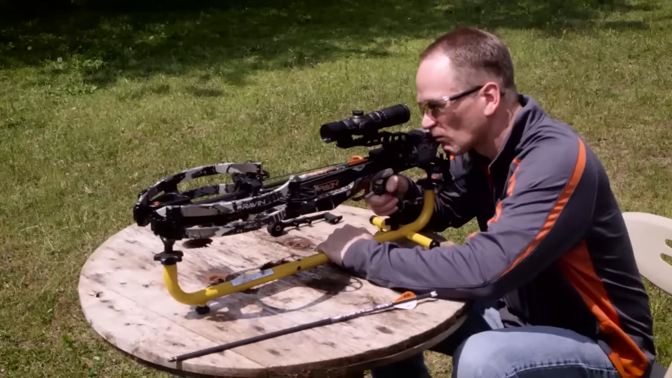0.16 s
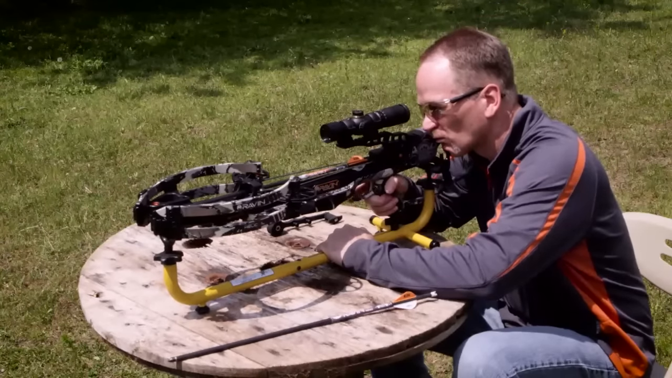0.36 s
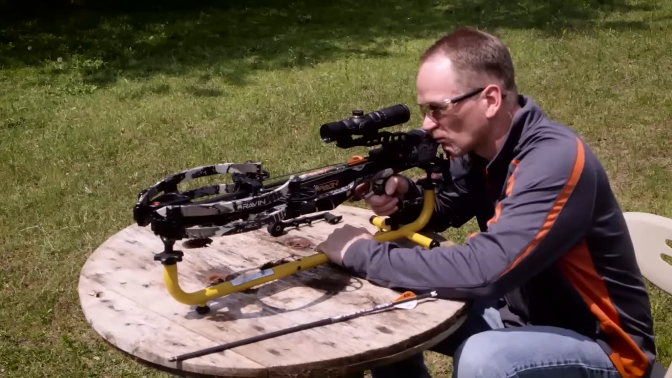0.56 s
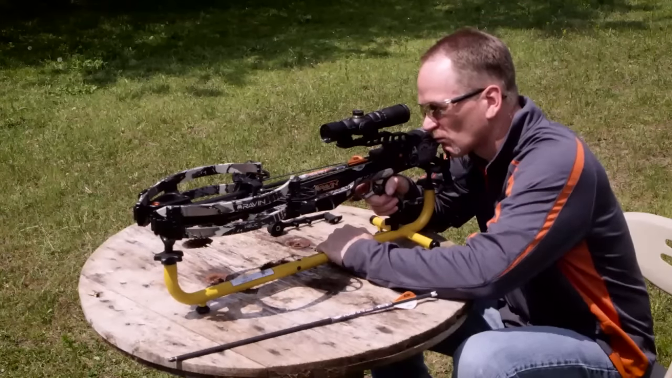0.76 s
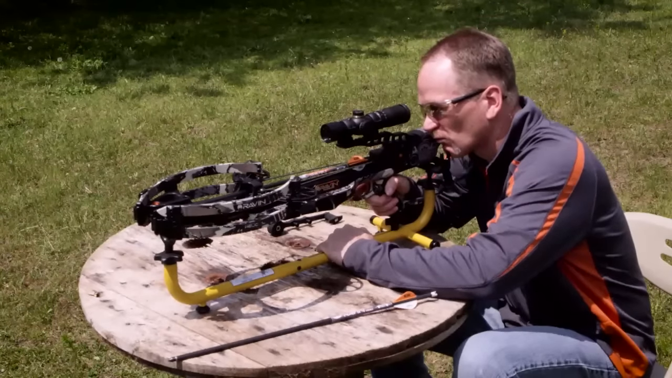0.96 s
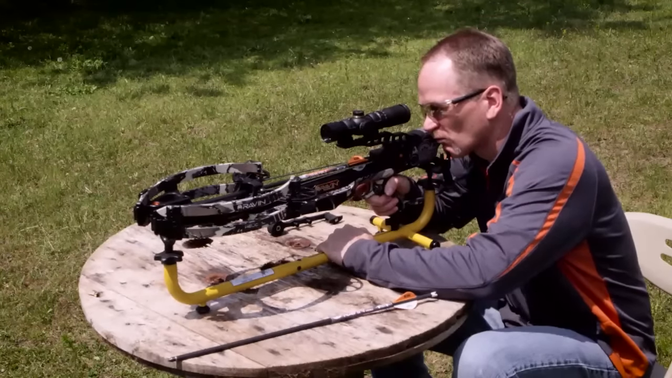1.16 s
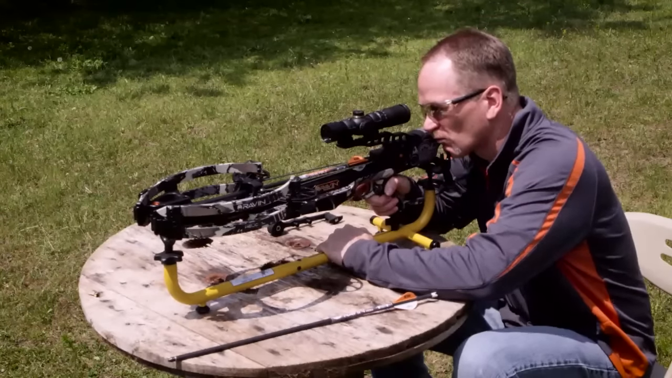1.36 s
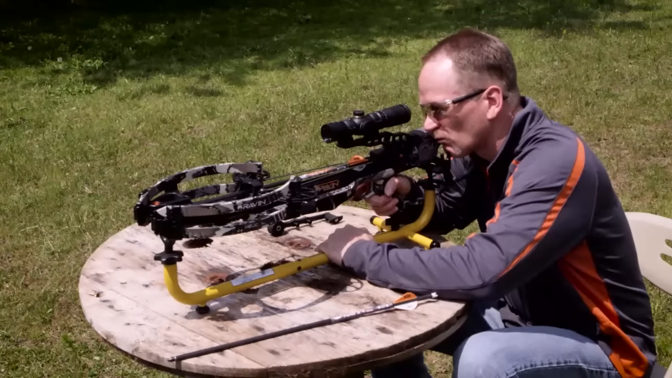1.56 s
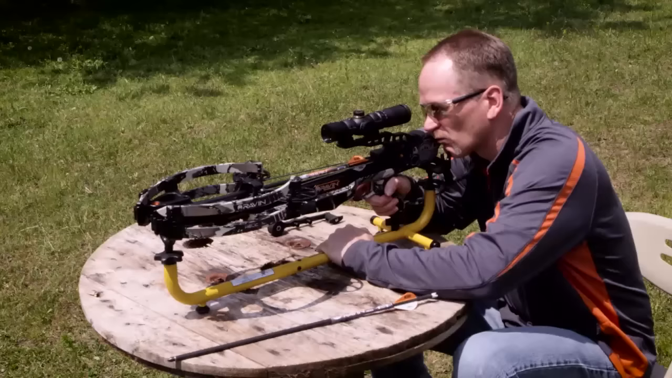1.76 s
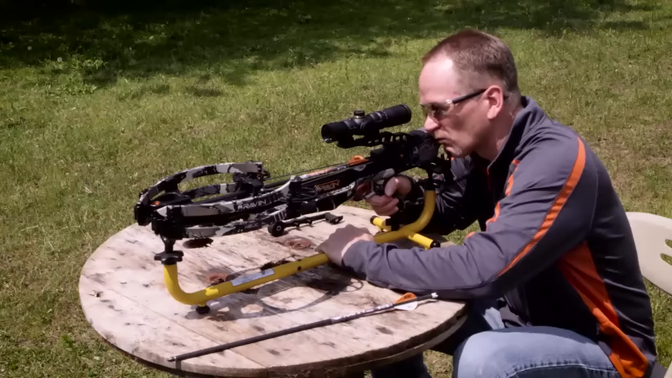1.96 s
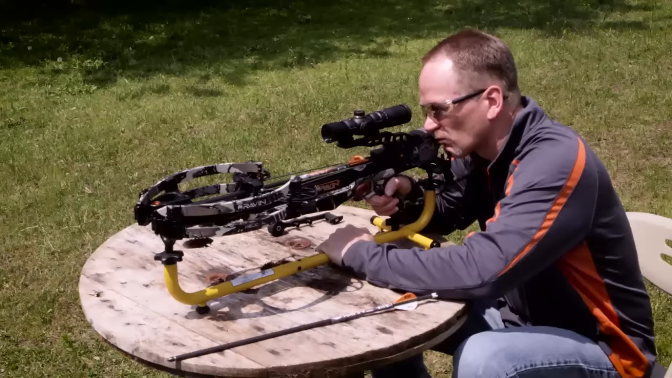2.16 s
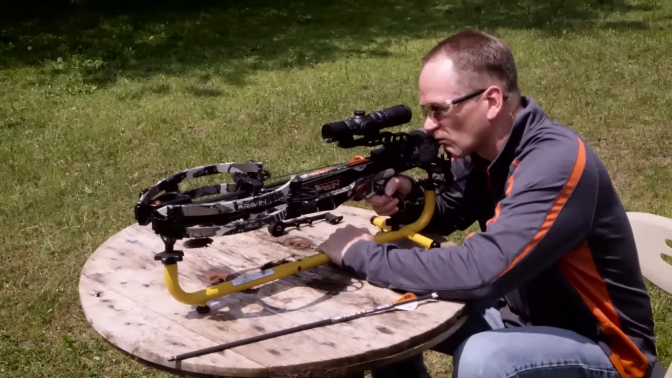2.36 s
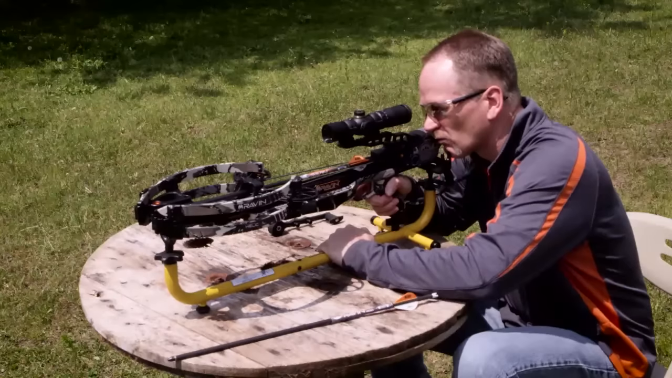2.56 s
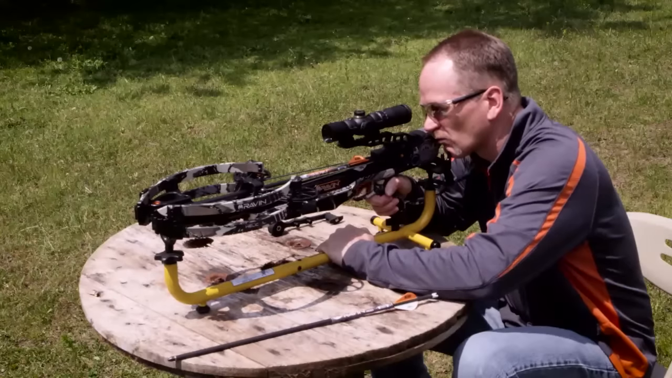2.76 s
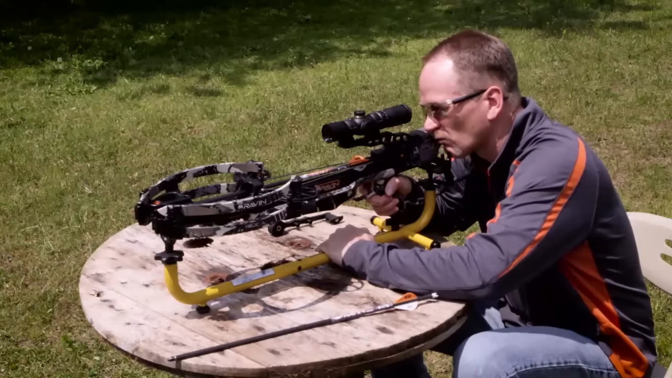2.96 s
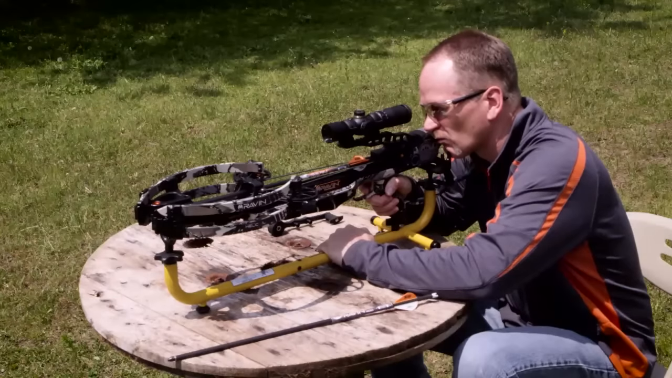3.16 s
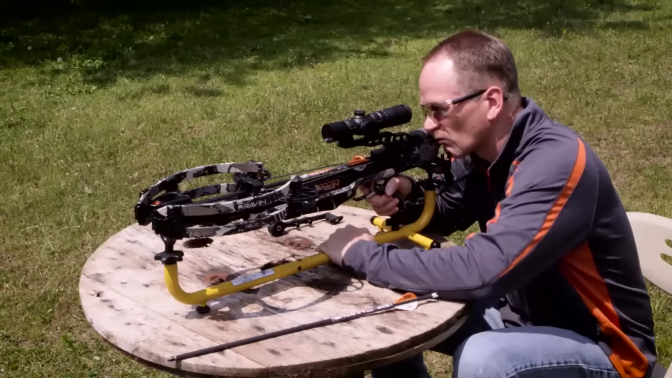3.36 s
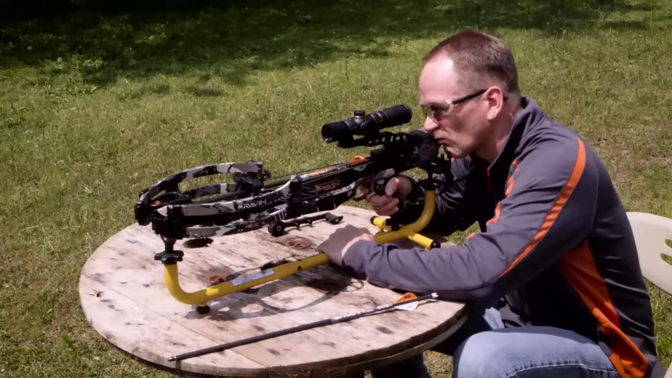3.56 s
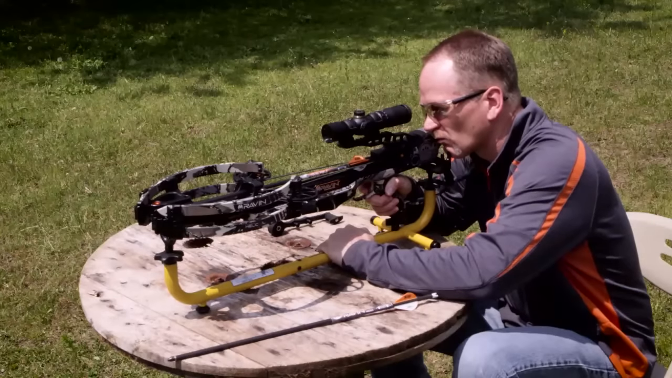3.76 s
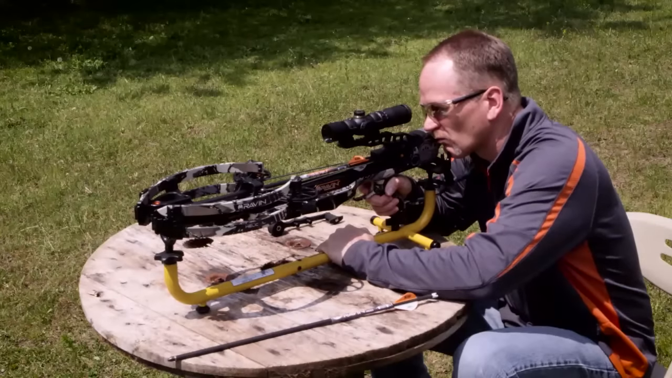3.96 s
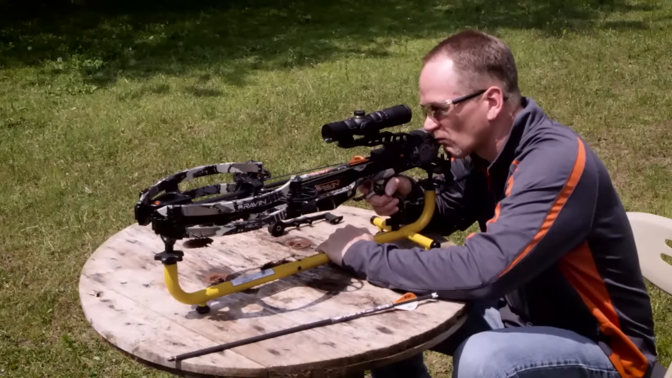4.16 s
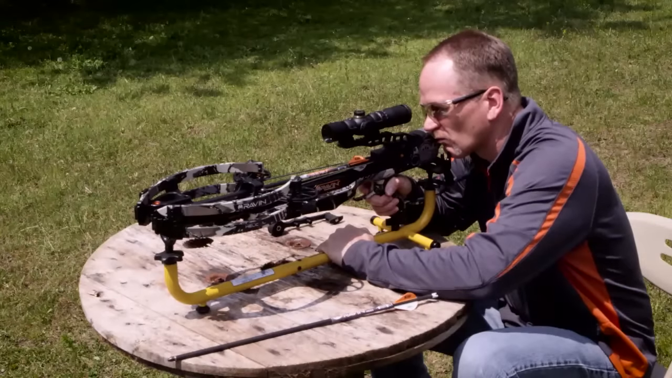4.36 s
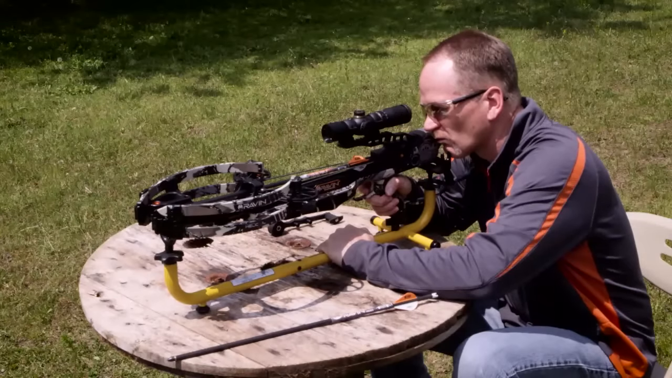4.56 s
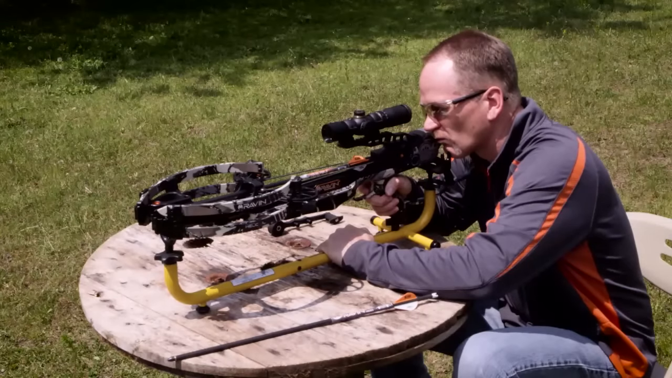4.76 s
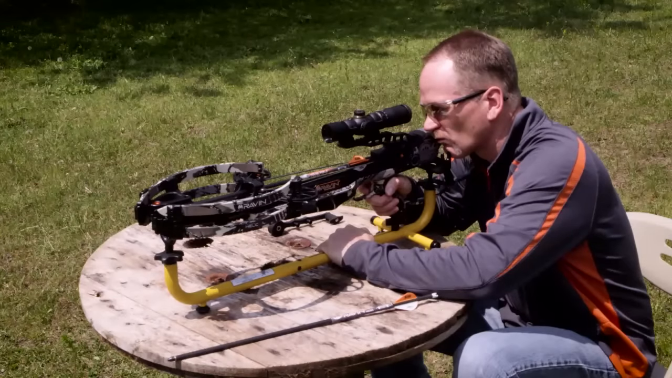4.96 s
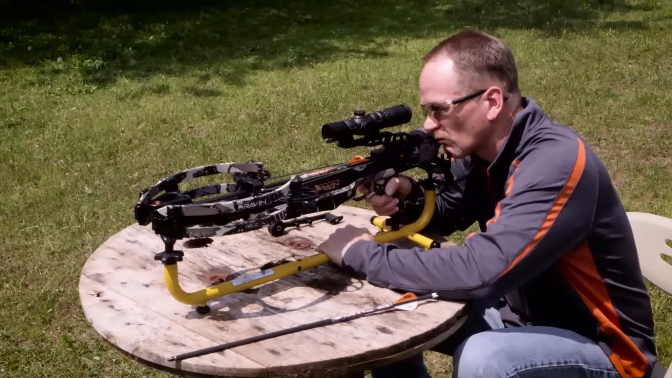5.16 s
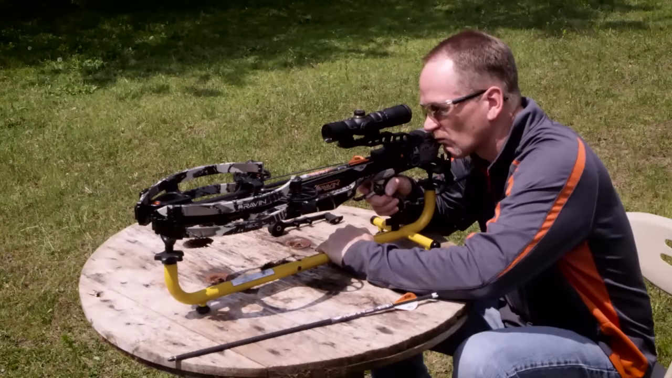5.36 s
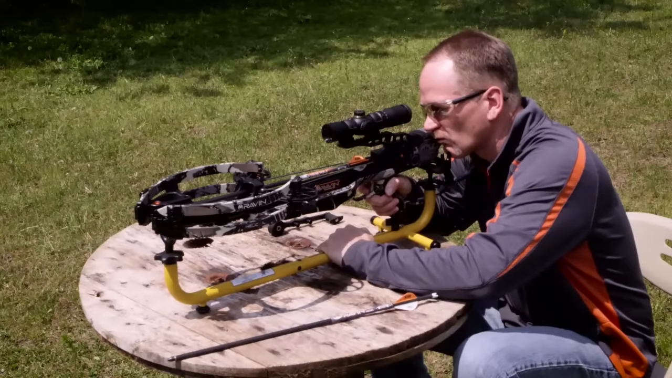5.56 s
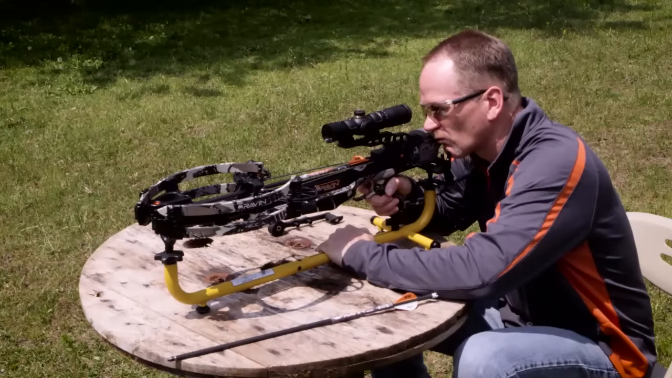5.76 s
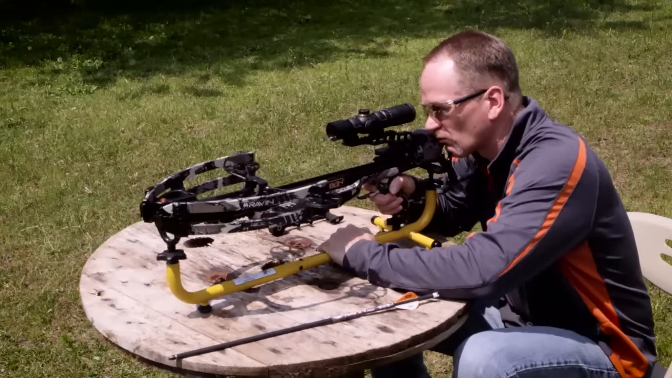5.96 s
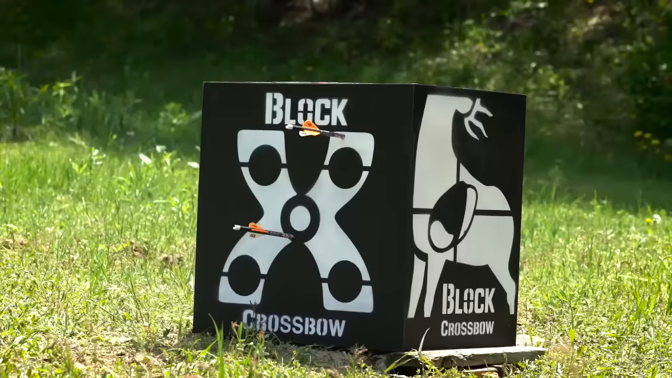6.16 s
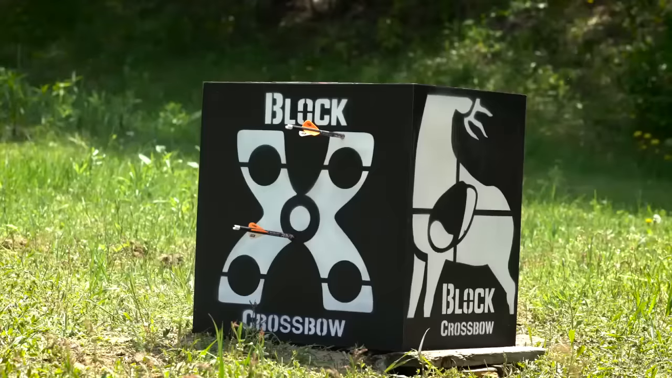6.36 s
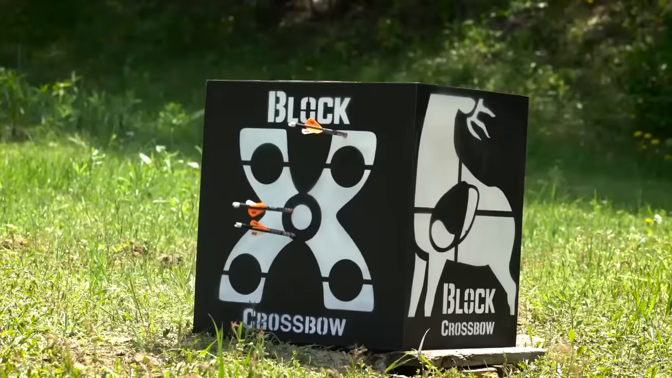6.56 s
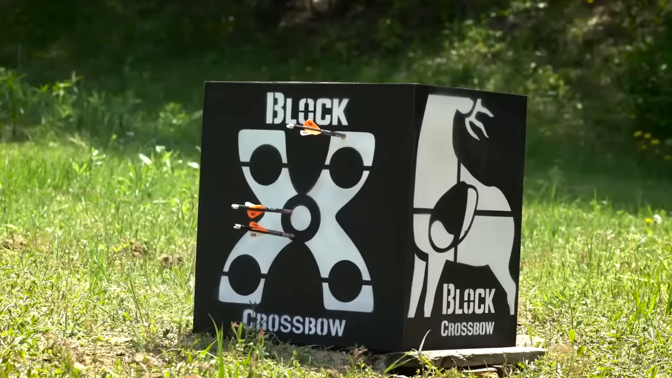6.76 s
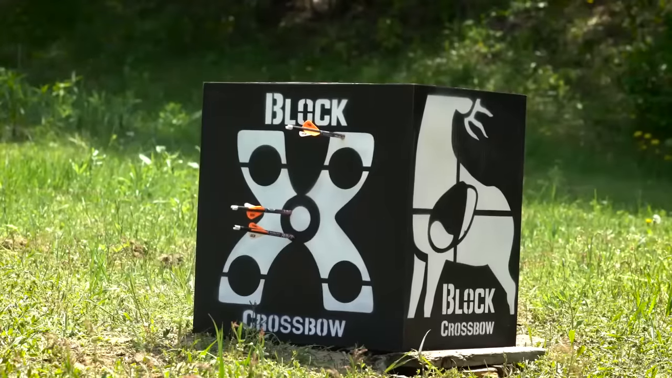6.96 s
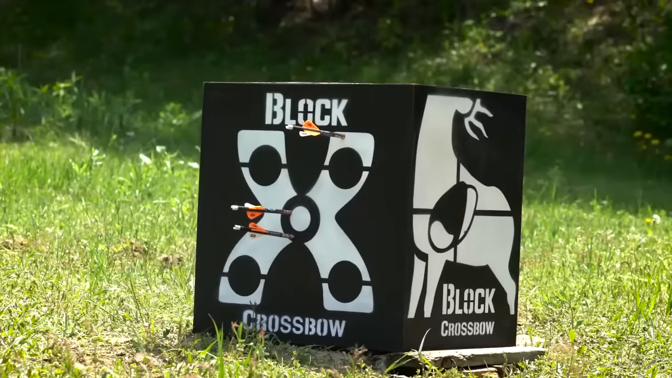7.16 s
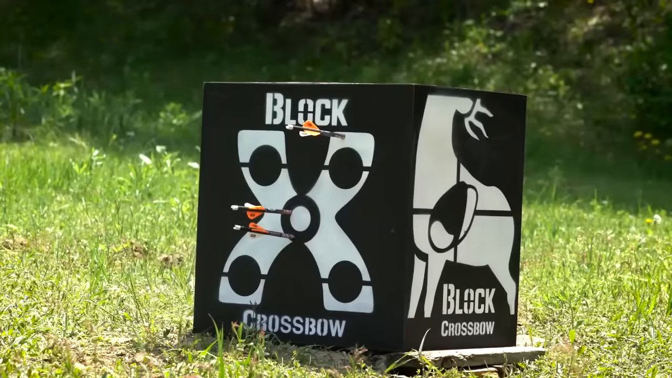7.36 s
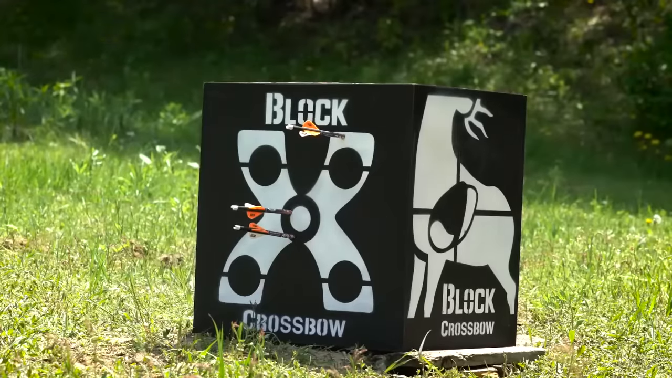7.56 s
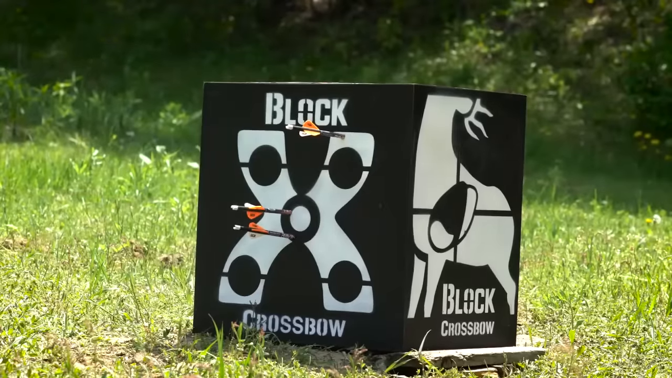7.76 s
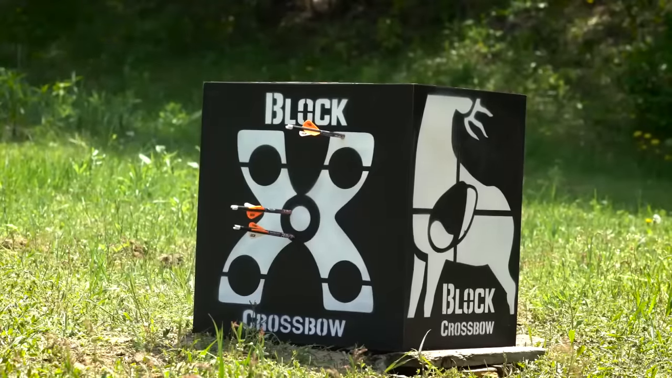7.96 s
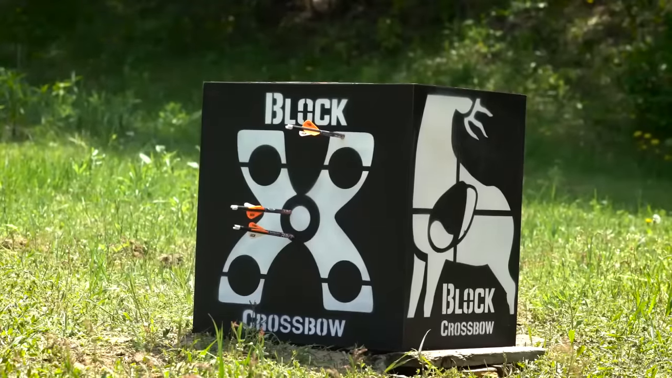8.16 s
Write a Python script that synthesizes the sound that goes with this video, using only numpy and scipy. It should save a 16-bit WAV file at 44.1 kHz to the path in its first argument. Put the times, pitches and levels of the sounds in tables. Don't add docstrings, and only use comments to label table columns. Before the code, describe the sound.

Outdoors, soft chirps, cloth rustle and faint taps lead to a sharp crossbow release, clattering and echoing off trees, followed by an arrow's dull hit.

```python
import sys
import numpy as np
from scipy import signal
from scipy.io import wavfile
from scipy.ndimage import uniform_filter1d

SR = 44100
rng = np.random.default_rng(int(sys.argv[2]) if len(sys.argv) > 2 else 0)


def to_wav(s):
    ch = np.atleast_2d(s).T
    pcm = np.round(np.clip(ch, -1, 1) * 32767)
    wavfile.write(sys.argv[1], SR, pcm.astype(np.int16))


def undo_db(level):
    steps = np.asarray(level, float) / 20
    return 10 ** steps


N = 361607

SHOT_S, LOOSE_S, STRIKE_S = 5.9, 5.9825, 6.501
CUT_S = 6.2
PITCH_WOBBLE = .005


def evened(x):
    return x / np.sqrt(np.mean(x ** 2) + 1e-20)


def add(mix, s, sound):
    part = mix[round(s * SR):][:len(sound)]
    part += sound[:len(part)]


def read(points, hz):
    f, value = np.transpose(points)
    return np.interp(np.log(hz + 1), np.log(f + 1), value)


def band_rms(x, lo_hz, hi_hz):
    band = signal.butter(4, [lo_hz, hi_hz], "band", fs=SR, output="sos")
    return np.sqrt(np.mean(signal.sosfilt(band, x) ** 2))


def hiss(colour, patchy_db, flicker_db, size=512, count=N):
    frames, hz = 4 * count // size + 5, np.fft.rfftfreq(size, 1 / SR)
    a, b, patches = rng.standard_normal((frames, len(hz), 3)).T
    patches = uniform_filter1d(patches, size=6, axis=0)
    patches = evened(uniform_filter1d(patches, size=16, axis=1))
    flicker = evened(uniform_filter1d(rng.standard_normal(frames), size=4))
    level_db = read(colour, hz)[:, None] + patchy_db * patches + flicker_db * flicker
    z = (a + 1j * b) * undo_db(level_db)
    return evened(signal.istft(z, nperseg=size, noverlap=3 * size // 4)[1][:count])


def resonate(x, hz, width_hz):
    turn = np.exp(2j * np.pi * np.cumsum(hz * np.ones(len(x))) / SR)
    r = np.exp(-np.pi * width_hz / SR)
    return 2 * (turn * signal.lfilter([1 - r], [1, -r], x / turn)).real


def stroke(t):
    # (time [s], level above the shake [dB])
    clatter = [(6.005, 5), (6.008, 6), (6.011, 3), (6.016, -2), (6.022, 2), (6.025, 2), (6.0285, 4),
               (6.0365, 2), (6.0415, 3), (6.0455, 9), (6.049, 3), (6.053, 2), (6.058, 0), (6.062, 0),
               (6.068, 6), (6.074, 7), (6.079, 8), (6.085, 8), (6.091, 4)]
    stop_s, slap_fall_db_per_s = 6.0005, 749.5
    shake_db, shake_fall_db_per_s, shake_s = -22.5, 350, 0.12
    between_slaps, slap_fade_s = .5, .0018
    after = np.maximum(t - stop_s, 0)
    run = undo_db(np.interp(t, [LOOSE_S, stop_s], [-28, -9]) - slap_fall_db_per_s * after)
    slaps = between_slaps
    for s, db in clatter:
        slaps = slaps + undo_db(db) * np.exp(-np.maximum(t - s, 0) / slap_fade_s) * (t > s)
    shake = undo_db(shake_db - shake_fall_db_per_s * after) * slaps * (t > stop_s)
    shake = shake * np.clip((shake_s - after) / 0.023, 0, 1)
    return np.clip((t - LOOSE_S) / .002 + 1, 0, 1) * np.sqrt(run ** 2 + shake ** 2)


def string_and_cams(t):
    # (frequency [Hz], density [dB per Hz])
    slap_colour = [(40, -40.5), (100, -19), (200, -17), (300, -40), (600, -29), (900, -17), (1600, -16),
                   (2340, -17.5), (3400, -17), (3910, -19), (5180, -14.5), (5680, -22), (8850, -19),
                   (10200, -23.5), (15500, -26), (16500, -61)]
    # (frequency [Hz], density [dB per Hz])
    rattle_colour = [(880, -31), (1500, -9), (2160, -6), (2270, -10), (2610, -3), (2960, -12), (3470, -7),
                     (4360, -14), (5860, -10), (6530, 0), (7130, -9), (8610, -3), (10500, -11),
                     (15900, -21)]
    # (frequency [Hz], width [Hz], level [dB])
    cams = [(6480, 300, -9), (8560, 400, -4)]
    dull_hz, brighten_s = 6000, 0.01
    force = stroke(t)
    slap = hiss(slap_colour, 2.5, 1.7, size=256, count=len(t))
    rattle = hiss(rattle_colour, 2.5, 1.7, size=256, count=len(t))
    dull = signal.sosfilt(signal.butter(2, dull_hz, fs=SR, output="sos"), slap)
    slap = dull + np.clip((t - LOOSE_S) / brighten_s, 0, 1) ** 2 * (slap - dull)
    late = np.clip((t - 6.004) / 0.016, 0, 1)
    out = force * (undo_db(-7.0) * (1 - late) * slap + undo_db(-.6) * late * rattle)
    for hz, width_hz, db in cams:
        out += undo_db(db) * resonate(force * late * rattle, hz, width_hz)
    return out


def frame_rings(count):
    # (time [s], level [dB], colour [Hz])
    blows = [(5.9876, -11.5, 1620), (5.9917, -2, 1100), (5.9948, -5, 930), (5.9969, -1.5, 2300),
             (5.9991, 6, 790), (6.0032, -6, 2280), (6.0076, -7.5, 2080), (6.0117, -13, 470)]
    # (frequency [Hz], peak [dB], t60 [s])
    frame = [(860, -17, .025), (802, -20, .045), (956.4, -6, .015), (1117.7, -6, .032), (1197, -24, .031),
             (1387, -20, .04), (1500, -19, .025), (1590, -12.5, .045), (1703, -17, .021),
             (2084.4, -15.5, .08), (2300, -9, .015), (2686.6, -25, .05), (2870, -15, .024),
             (3317, -15, .04), (5150, -17, .04), (6400, -18, .06), (8500, -17, .07)]
    # (time [s], frequency [Hz], peak [dB], t60 [s], rise
    # [s])
    late_parts = [(6.0007, 404.5, -16.5, .078, .002), (6.0008, 424.5, -17, .31, .0052),
                  (5.9928, 170, -23, .07, .002), (5.986, 80, -33, .08, .004),
                  (6.0078, 600, -25, .088, .0032), (6.0224, 1281, -21, .133, .0107),
                  (6.0176, 1093, -27, .073, .0005), (6.029, 855, -39.5, .2, .002),
                  (6.0185, 2549, -32, .12, .001), (6.028, 8650, -36, .14, .004),
                  (6.004, 746, -21, .09, .003), (6.06, 431, -43, .5, .05), (6.03, 1070, -40, .2, .004),
                  (6.025, 1770, -40, .16, .003), (6.02, 2062, -38, .13, .003), (6.03, 2170, -39, .2, .004),
                  (6.015, 2390, -36, .1, .002), (6.015, 3381, -34, .09, .002), (6.03, 6522, -40, .14, .004)]
    blow_db_per_octave = 5.0
    out, t = np.zeros(count), np.arange(SR // 2) / SR
    for s, blow_db, colour_hz in blows:
        for hz, db, t60_s in frame:
            rise = 1 - np.exp(-t * hz / 0.81)
            off_db = blow_db_per_octave * abs(np.log2(hz / colour_hz))
            fall = undo_db(db + blow_db - 1.5 - off_db - 60 * t / t60_s)
            add(out, s - SHOT_S, fall * rise * np.sin(2 * np.pi * hz * t))
    for s, hz, db, t60_s, rise_s in late_parts:
        swell = undo_db(db - 60 * t / t60_s) * (1 - np.exp(-t / rise_s))
        add(out, s - SHOT_S, swell * np.sin(2 * np.pi * hz * t))
    return out


def tree_echo(t):
    # (frequency [Hz], t60 [s])
    decay = [(100, 2.3), (500, 0.53), (1500, 0.6), (3000, 0.9), (6000, .8), (12000, 0.56)]
    # (frequency [Hz], density [dB per Hz])
    colour = [(35, -46.5), (60, -13), (120, -1), (300, -5.5), (644, -14), (1200, -13), (1500, -18),
              (2400, -20), (4000, -25.5), (11400, -40), (14000, -60)]
    hz, frame_s, z = signal.stft(hiss(colour, 1.8, 1.2, count=len(t)), SR, nperseg=256)
    z = z * undo_db(-60 * np.maximum(frame_s + SHOT_S - 6.2, -.1) / read(decay, hz)[:, None])
    echo = signal.istft(z, SR, nperseg=256)[1][:len(t)]
    return undo_db(-52.5) * echo * np.clip((t - 6.01) / 0.013, 0, 1)


def woods(t):
    # (frequency [Hz], width [Hz], level [dB])
    wood_rings = [(830, 200, -72), (1200, 70, -67), (1350, 350, -73), (2050, 300, -70), (2450, 400, -72)]
    start_s, end_s, fall_db_per_s = 6.16, 6.42, 9
    rings = np.zeros(len(t))
    for hz, width_hz, db in wood_rings:
        fuzz = resonate(rng.standard_normal(len(t)), hz, width_hz)
        rings += undo_db(db) * evened(resonate(fuzz, hz, 2 * width_hz))
    on = np.clip((t - start_s) / .06, 0, 1) * np.clip((end_s - t) / .04 + 1, .4, 1)
    on = on * (t < STRIKE_S + .1)
    lumps = undo_db(1.6 * evened(uniform_filter1d(rng.standard_normal(len(t)), size=900)))
    return rings * on * lumps * undo_db(-fall_db_per_s * (t - start_s))


def strike_return(t):
    # (frequency [Hz], density [dB per Hz])
    return_colour = [(200, -25), (500, -2), (1000, -6), (1400, -4), (1800, -2), (2400, -9), (4000, -16.5),
                     (8000, -26), (12000, -39.5), (16000, -70)]
    tree_lag_s, near_db, near_fall_db_per_s = 0.028, -62, 300
    far_db, far_fall_db_per_s, far_bend_db_per_s2 = -67, 16, 150
    near, far = np.maximum(t - STRIKE_S, 0), np.maximum(t - STRIKE_S - tree_lag_s, 0)
    back = undo_db(far_db - far_fall_db_per_s * far - far_bend_db_per_s2 * far ** 2)
    back = back * np.minimum(far / .003, 1)
    scatter = undo_db(near_db - near_fall_db_per_s * near) * np.minimum(near / 0.00204, 1)
    return undo_db(3.5) * (scatter + back) * hiss(return_colour, 1.71, 1.3, size=256, count=len(t))


def shot():
    start = round(SHOT_S * SR)
    t = np.arange(start, start + 3 * SR // 2) / SR
    out = np.zeros(N)
    near = string_and_cams(t) + frame_rings(len(t))
    add(out, SHOT_S, near + tree_echo(t) + strike_return(t) + woods(t))
    return out


def knocks():
    # (time [s], peak [dB], pitch [Hz], t60 [s])
    bodies = [(.1355, -49.5, 900, 0.0168), (0.2143, -47.5, 1330, 0.01), (.386, -54, 500, 0.0116),
              (0.751, -47, 332, .035), (1.1243, -35, 1047, 0.0074), (1.1262, -44.5, 607, 0.016),
              (1.127, -57, 1350, .07), (1.158, -58, 500, .02), (.074, -60, 680, .02), (.258, -57, 450, .02),
              (.441, -59, 1050, .014), (.474, -59, 600, .014), (6.111, -29, 126.6, 0.031),
              (6.135, -26, 138, 0.026), (6.15, -51, 1072, 0.028), (6.373, -50.5, 230, .052),
              (6.39, -50, 169, 0.0546), (6.4971, -35, 560, 0.016), (6.4985, -39, 170, 0.03),
              (6.5002, -45, 750, 0.03), (6.5049, -33, 340, 0.022), (7.1586, -25, 153.8, 0.024),
              (7.158, -47, 1500, .012), (7.1591, -40, 377, 0.032), (7.1703, -36, 200, 0.033),
              (7.186, -46, 250, 0.0264), (7.2113, -47, 300, 0.023), (7.192, -50, 150, .03),
              (7.243, -50, 140, .03), (7.1585, -44, 900, .012), (6.183, -46, 190, .03),
              (1.1245, -46, 400, .018), (.136, -56, 520, .016)]
    # (time [s], peak [dB], colour [Hz])
    ticks = [(.1355, -58, 1490), (0.2144, -62, 2000), (.386, -58, 1200), (.75, -68.5, 2000),
             (.844, -61.5, 6500), (1.1248, -49.5, 2300), (1.1267, -57, 3230), (1.221, -65.5, 5540),
             (5.195, -64, 4520), (6.157, -53.5, 12000), (6.157, -52, 15000), (6.1575, -51, 8600),
             (6.149, -50, 15200), (6.139, -55, 14000), (6.139, -56, 9000), (6.149, -52, 13200),
             (6.149, -46, 6140), (6.15, -42, 8800), (6.182, -55, 5000), (6.4964, -36, 2170),
             (6.4964, -49.5, 5700), (6.4964, -52, 3600), (6.4964, -55, 9000), (6.4963, -33, 600),
             (6.5037, -30, 400), (7.1581, -45.5, 2800), (7.158, -34, 610), (7.1582, -57, 5600),
             (7.1582, -62, 7200), (7.1584, -46, 1080), (7.186, -58.5, 2100), (7.2114, -57, 2223),
             (.075, -65, 2250), (.432, -66, 3400), (.442, -64, 2100), (.475, -66, 2000), (.387, -64, 2900),
             (.214, -64, 3100), (7.186, -68, 4000), (7.186, -72, 8500), (7.2114, -66, 4000),
             (7.2114, -68, 6500), (7.2114, -70, 8600), (7.2776, -64, 2270), (7.224, -70, 4200),
             (6.4966, -58, 10800), (6.4968, -55, 7900), (6.5325, -57, 1900), (5.9812, -44, 2600),
             (5.9855, -34, 3200), (5.9855, -36, 8000)]
    # (time [s], peak [dB], pitch [Hz])
    thuds = [(0.494, -50, 140.2), (0.555, -49.5, 92.3), (0.626, -47.5, 210), (0.666, -43.5, 140),
             (.715, -48, 120), (.752, -54, 170), (1.588, -48, 101), (.875, -53, 90), (1.88, -50, 110),
             (2.0, -55, 119), (2.24, -53, 99), (2.84, -50.5, 79), (2.958, -56, 64.6), (3.836, -59, 119),
             (5.661, -63, 122)]
    softness = 2.3
    out, t = np.zeros(N), np.arange(2500) / SR
    for s, db, hz, t60_s in bodies:
        swing = (1 - np.exp(-t * hz / 0.25)) * np.sin(2 * np.pi * hz * t)
        add(out, s, swing * undo_db(db - 60 * t / t60_s))
    for s, db, hz in ticks:
        grit = rng.standard_normal(len(t)) * undo_db(-60 * t / 0.014)
        grit = resonate(resonate(grit, 1.1 * hz, 2.0 * hz), hz, 2.5 * hz)
        tick = 0.22 * grit - np.sin(2 * np.pi * hz * t) * undo_db(-60 * t / 0.0082)
        soften = signal.butter(2, min(softness * hz, .45 * SR), fs=SR)
        add(out, s, undo_db(db) * signal.lfilter(*soften, tick))
    for s, db, hz in thuds:
        lump = np.exp(1 - t / 0.00738) * t / 0.0071
        add(out, s, undo_db(db - 3.5) * np.sin(2 * np.pi * hz * t) * lump)
    return out


def note(length_s, hz0, hz1, db, glide_from, glide_to, top, start_db, end_db):
    u = np.arange(0, 1, 1 / (length_s * SR))
    ease = (1 - np.cos(np.pi * np.interp(u, [glide_from, glide_to], [0, 1]))) / 2
    shake = 1 + PITCH_WOBBLE * evened(uniform_filter1d(rng.standard_normal(len(u)), size=120))
    tone = np.sin(2 * np.pi * np.cumsum((hz0 + (hz1 - hz0) * ease) * shake) / SR)
    swell_db = db + np.interp(u, [0, top, 1], [start_db, 0, end_db])
    return np.sqrt(2) * undo_db(swell_db) * tone * signal.windows.tukey(len(u), .3)


def arch(length_s, hz0, top_hz, db):
    u = np.arange(0, 1, 1 / (length_s * SR))
    hz = hz0 + (top_hz - hz0) * np.sin(np.pi * u ** .85)
    tone = np.sin(2 * np.pi * np.cumsum(hz) / SR)
    return np.sqrt(2) * undo_db(db) * tone * signal.windows.tukey(len(u), .4)


def buzz(length_s, hz0, hz1, width_hz, db):
    glide = np.linspace(hz0, hz1, round(length_s * SR))
    rasp = resonate(rng.standard_normal(len(glide)), glide, width_hz)
    rasp = resonate(rasp, glide, width_hz)
    return undo_db(db) * evened(rasp) * signal.windows.tukey(len(glide), .15)


def trill(length_s, beats_per_s, hz0, hz1, swing_hz, throb, lag_rad, db):
    count = round(length_s * SR)
    wander = evened(uniform_filter1d(rng.standard_normal(count), size=600))
    rough = evened(uniform_filter1d(rng.standard_normal(count), size=150))
    beat = 2 * np.pi * np.cumsum(beats_per_s * (1 + 0.07 * wander)) / SR
    hz = np.linspace(hz0, hz1, count) * (1 + PITCH_WOBBLE * wander)
    hz = hz + swing_hz * (np.cos(beat) + 0.17 * rough)
    tone = np.sin(2 * np.pi * np.cumsum(hz) / SR) * (1 + throb * np.cos(beat - lag_rad))
    tone = tone * undo_db(.7 * np.cos(beat))
    return undo_db(db) * evened(tone) * signal.windows.tukey(count, .06) * undo_db(np.linspace(.9, -1.4, count))


def birds():
    # (time [s], length [s], start [Hz], end [Hz], level [dB])
    falling = [(0.542, .05, 3850, 3065, -75.5), (1.511, .045, 3950, 3120, -77),
               (2.231, 0.051, 4150, 3193, -76), (2.41, 0.054, 4140, 3074, -73.5),
               (2.589, .055, 4100, 3114, -73), (2.777, .045, 3810, 3058, -76),
               (2.963, .04, 3950, 3200, -77.5), (5.424, 0.057, 4080, 3150, -71.5),
               (5.693, 0.05, 3950, 3050, -71.5)]
    rising = [(.108, 0.085, 3300, 4560, -70.5), (1.118, .06, 3480, 4250, -70.5),
              (1.33, .05, 3370, 3556, -81), (2.03, 0.066, 3376, 4500, -70), (3.8, 0.072, 3440, 4100, -71)]
    high = [(5.262, 0.0606, 7250, 6670, -73), (5.532, 0.075, 7273, 6640, -77), (5.8, .05, 7150, 6700, -80)]
    thin = [(3.19, 0.048, 5500, 5520, -81), (3.51, 0.038, 5490, 5500, -77.5),
            (3.812, .058, 5500, 5500, -82), (4.691, 0.053, 5260, 5280, -72.5),
            (4.735, .035, 5206, 5070, -74)]
    mellow = [(1.59, 0.18, 5945, 6790, -74.5), (1.85, .05, 2610, 2582, -76),
              (3.152, 0.05, 3030, 3000, -78.5), (3.245, 0.125, 2900, 2800, -79),
              (3.58, 0.14, 2870, 2830, -76), (3.85, 0.14, 2900, 2840, -76.5),
              (5.152, 0.025, 2280, 2520, -78), (5.92, 0.059, 2580, 2520, -81)]
    # (glide from [share], glide to [share], loudest at [share], start [dB], end [dB])
    shapes = [
        (.1, .8, .58, -9, -14),
        (0.029, .36, 0.28, -10.5, -17),
        (0.0013, .7, 0.51, -15, -13),
        (.1, 0.865, 0.51, -13.5, -13.5),
        (.2, .85, .25, -4, -5),
    ]
    # (time [s], length [s], start [Hz], top [Hz], level [dB])
    arched = [(3.36, .095, 2060, 2190, -78), (3.725, .075, 2650, 2960, -81), (3.285, .035, 2100, 2220, -80)]
    # (time [s], length [s])
    buzz_times = [(2.06, .05), (3.04, .1), (3.845, .03), (3.8, .05), (.11, .04), (1.115, .012), (2.03, .02),
                  (1.52, .03), (.14, .03), (3.975, .04)]
    # (start [Hz], end [Hz], width [Hz], level [dB])
    buzzes = [(3838, 2500, 620, -76), (2700, 3030, 670, -81), (3820, 2850, 300, -76.5),
              (5800, 7200, 340, -84), (6500, 7350, 400, -79.5), (6900, 6900, 200, -78),
              (6800, 6900, 200, -80), (5800, 5200, 200, -85), (4260, 2480, 400, -77), (4100, 4110, 56, -84)]
    # (time [s], length [s], beat [1/s])
    trill_times = [
        (4.035, .61, 182),
        (4.852, .255, 47),
    ]
    # (start [Hz], end [Hz], swing [Hz], throb [0-1], throb lag [rad], level [dB])
    trills = [
        (4400, 4330, 710, 0.3, .3, -77.5),
        (3430, 3190, 75, 0.8, 2, -76),
    ]
    out = np.zeros(N)
    for rows, shape in zip((falling, rising, high, thin, mellow), shapes):
        for s, *row in rows:
            add(out, s, note(*row, *shape))
    for s, *row in arched:
        add(out, s, arch(*row))
    for (s, length_s), row in zip(buzz_times, buzzes):
        add(out, s, buzz(length_s, *row))
    for (s, *beat), row in zip(trill_times, trills):
        add(out, s, trill(*beat, *row))
    t = np.arange(SR // 2) / SR
    smear = rng.standard_normal(len(t)) * undo_db(-60 * t / .65)
    return out + undo_db(-4.5) * signal.oaconvolve(out, smear / np.linalg.norm(smear))[:N]


def cloth_rustle(t):
    # (time [s], length [s], level [dB])
    rubs = [(0, 0.062, -74), (0.246, 0.223, -82), (0.456, .14, -87.5), (0.633, 0.23, -76),
            (0.839, 0.28, -83), (1.1, 0.129, -84), (1.544, 0.128, -87), (1.854, 0.275, -85.5),
            (2.38, 0.303, -84.5), (2.733, .05, -87), (2.86, 0.185, -87), (3.77, .1, -85)]
    # (frequency [Hz], density [dB per Hz])
    cloth_colour = [(880, -38), (1500, -5), (2120, -6), (2790, -8.5), (3050, -11), (3270, -7), (6860, -8),
                    (15900, -18)]
    rest_db, still_s, top = -92, 3.8, 0.65
    level = undo_db(rest_db) * np.clip(1 - t / still_s, 0, 1)
    for s, length_s, db in rubs:
        knots_s = s + length_s * np.array([0, top / 2, top, 1])
        level = level + undo_db(db) * np.interp(t, knots_s, [0.033, 0.92, 0.75, 0.0069])
    return undo_db(3.0) * level * hiss(cloth_colour, 2.3, 1.9, size=256)


def air_and_wind(t):
    # (frequency [Hz], density [dB per Hz])
    lawn_colour = [(12, -43), (20, -15.5), (75, 2), (161, -8.5), (249, -6), (301, -10), (678, -12),
                   (1170, -20.5), (2230, -23), (2770, -26), (3260, -27), (4640, -32), (11400, -37),
                   (13000, -52.5)]
    # (frequency [Hz], density [dB per Hz])
    field_colour = [(12, -46.5), (20, -4), (82, -4), (161, -7.5), (217, -9), (249, -3), (344, -25),
                    (394, -8.5), (439, -15.5), (490, -8.5), (600, -13), (800, -9.5), (1650, -22),
                    (3540, -32), (10500, -38.5), (13000, -40.5)]
    # (time [s], level [dB])
    wind = [(0.0, -62.5), (0.05, -57), (0.15, -70.5), (0.55, -62.5), (0.91, -64), (1.06, -72), (1.5, -75.5),
            (1.6, -69), (2.5, -68), (2.97, -72), (3.38, -74.5), (3.93, -67), (4.57, -82.5), (5.5, -83.5),
            (5.95, -75), (6.25, -66), (6.8, -72.5), (8.2, -74)]
    # (frequency [Hz], density [dB per Hz])
    gust_colour = [(20, -12), (60, -2.5), (150, -1.5), (300, -5.5), (600, -20), (1500, -46), (16000, -82)]
    lawn_db, field_db, leaves_share = -75.5, -73, 0.11
    wind_db = np.interp(t, *np.transpose(wind))
    lawn = hiss(lawn_colour, 0.59, 0.6073, size=2048)
    field = hiss(field_colour, 1.38, 0.23, size=2048)
    share = np.clip((t - CUT_S) / 0.1, 0, 1)
    air = (1 - share) * undo_db(lawn_db) * lawn / band_rms(lawn, 500, 1500)
    air += share * undo_db(field_db) * field / band_rms(field, 580, 1380)
    air *= undo_db(leaves_share * (wind_db - wind_db.mean()))
    return air + undo_db(wind_db) * hiss(gust_colour, 3.0, 3.5, size=1024)


def drones(t):
    # (from [s], to [s], frequency [Hz])
    drone_times = [(-1, 8.3, 81), (4.4, 5.95, 248), (2.6, 5.95, 680), (-1, 8.3, 2250)]
    # (width [Hz], level [dB])
    drone_levels = [(9.96, -73.5), (6.48, -75.5), (30, -82), (300, -86.5)]
    out = np.zeros(N)
    for (from_s, to_s, hz), (width_hz, db) in zip(drone_times, drone_levels):
        on = np.clip((t - from_s) / 0.38, 0, 1) * (t < to_s)
        hum = signal.filtfilt(*signal.iirpeak(hz, hz / width_hz, SR), rng.standard_normal(N))
        out += undo_db(db) * on * evened(hum)
    return out


def background():
    t = np.arange(N) / SR
    return air_and_wind(t) + cloth_rustle(t) + drones(t)


def scene():
    mono = shot() + knocks() + birds() + background()
    return np.array([mono, mono])


def band_limit(x):
    return signal.sosfilt(signal.butter(12, 16020, fs=SR, output="sos"), x)


def record(dry):
    # (frequency [Hz], level [dB])
    mismatch = [(200, -51.5), (2000, -40), (5000, -28), (9000, -15.5), (14000, -12)]
    hz, frame_s, z = signal.stft(0.96 * np.tanh(dry[0] / 1.001), SR, nperseg=1024)
    power = uniform_filter1d(abs(z) ** 2, size=16, axis=0)
    faint = (power < undo_db(-110.5) ** 2) | (frame_s > CUT_S + .1)
    weak = (hz[:, None] > 12000) & faint
    z = z * np.where(weak, undo_db(-25), 1) * (hz[:, None] < 15750)
    side = z * undo_db(read(mismatch, hz))[:, None] * np.exp(2j * np.pi * rng.random(z.shape))
    pair = signal.istft(np.array([z + side, z - side]), SR, nperseg=1024)[1][:, :N]
    return band_limit(pair)


dry = scene()
out = record(dry)
to_wav(out)
```